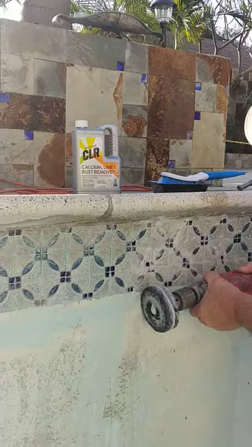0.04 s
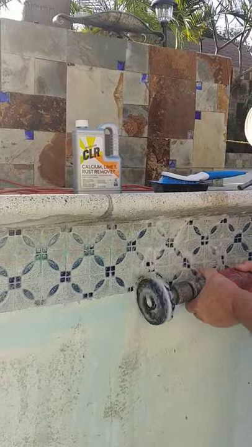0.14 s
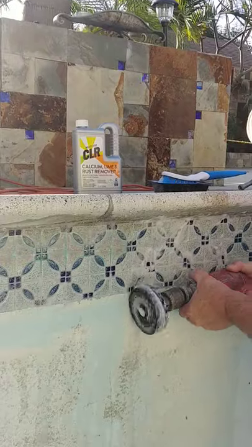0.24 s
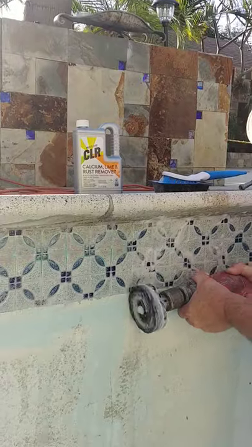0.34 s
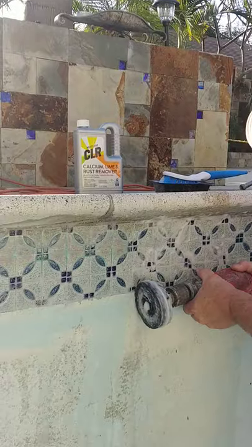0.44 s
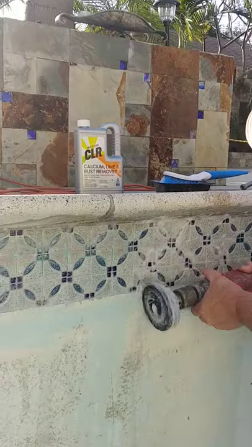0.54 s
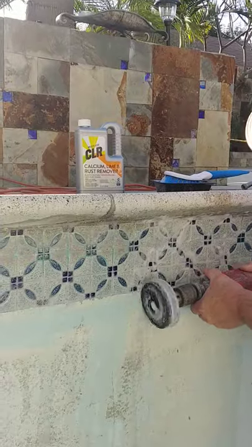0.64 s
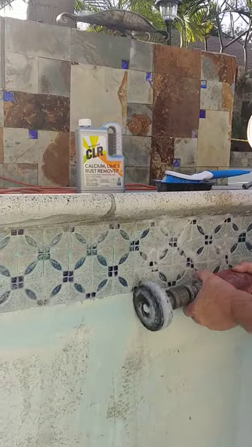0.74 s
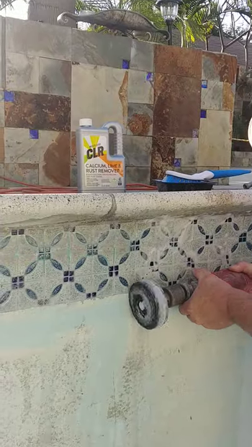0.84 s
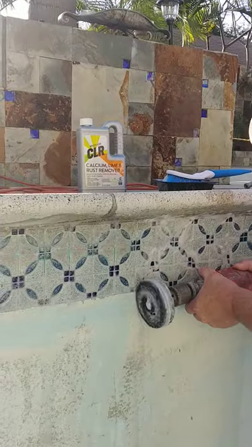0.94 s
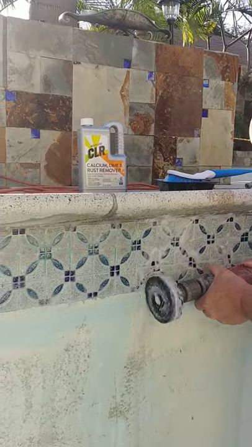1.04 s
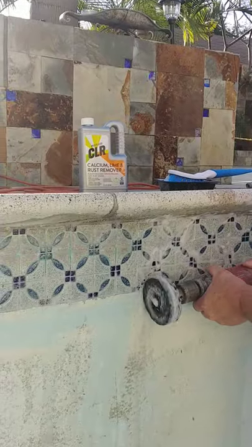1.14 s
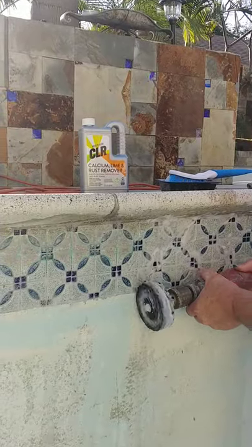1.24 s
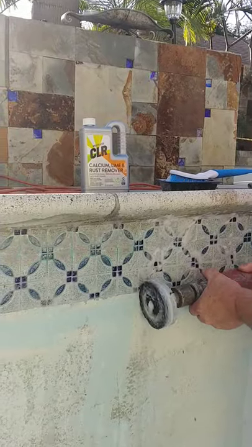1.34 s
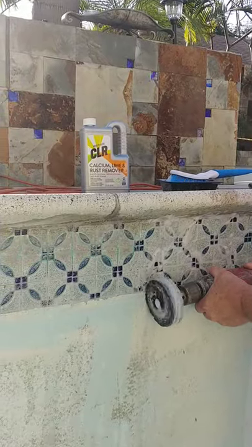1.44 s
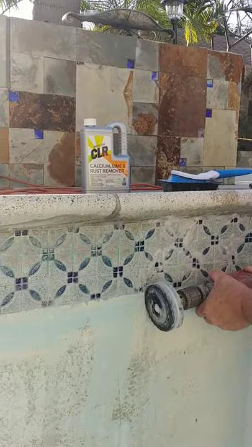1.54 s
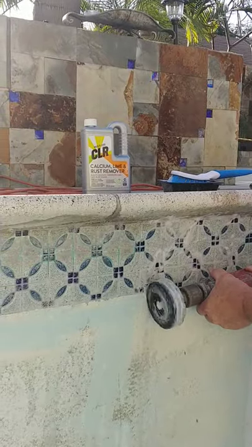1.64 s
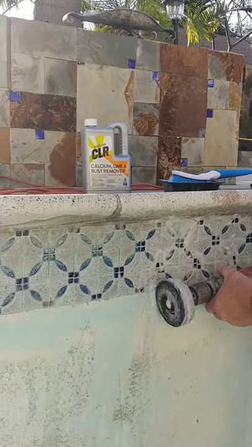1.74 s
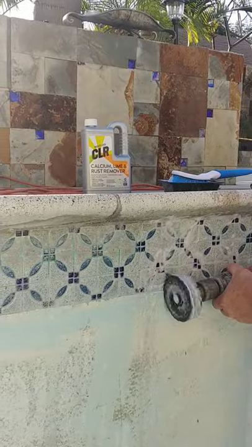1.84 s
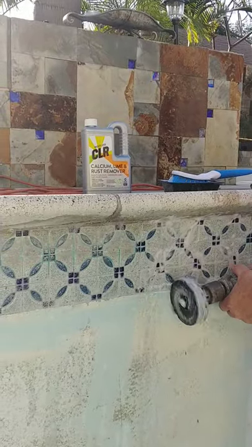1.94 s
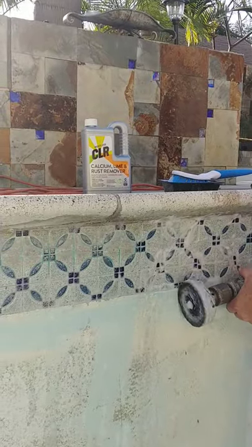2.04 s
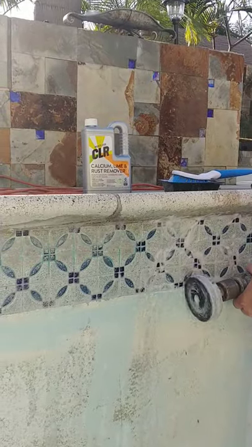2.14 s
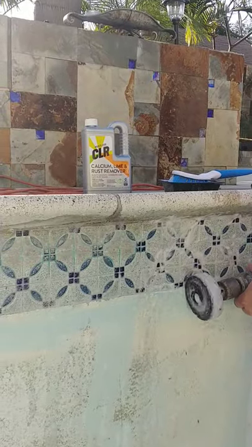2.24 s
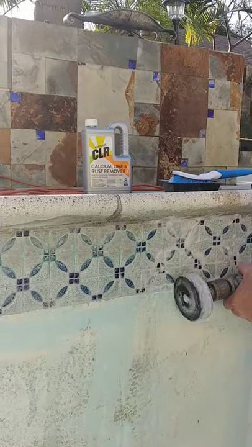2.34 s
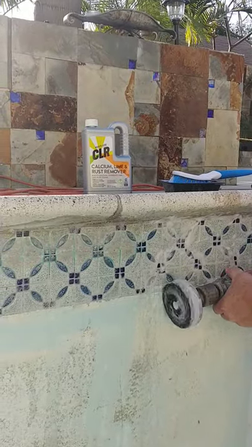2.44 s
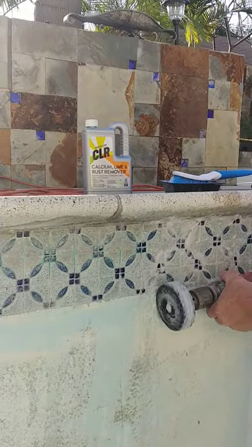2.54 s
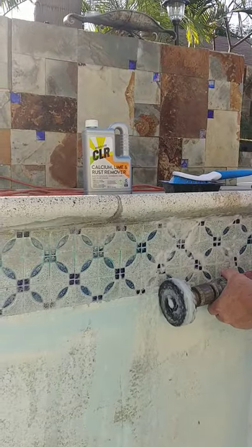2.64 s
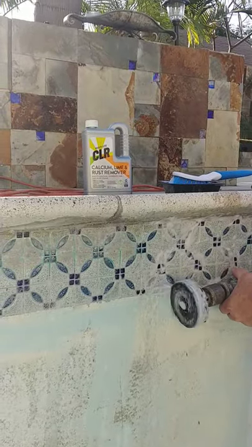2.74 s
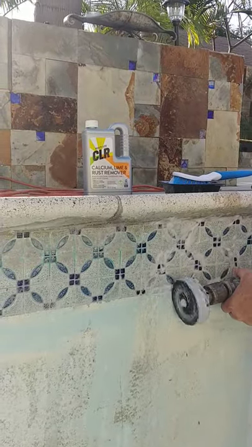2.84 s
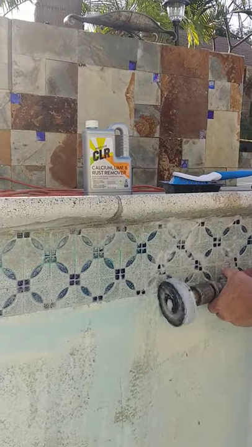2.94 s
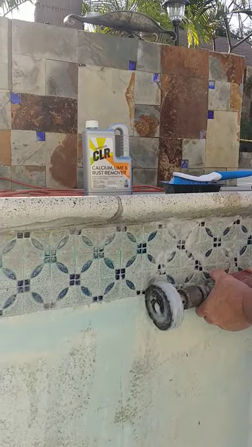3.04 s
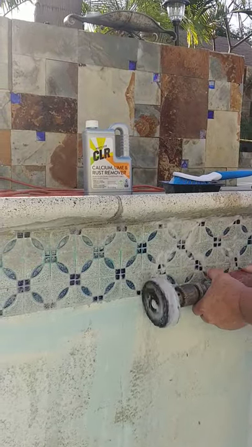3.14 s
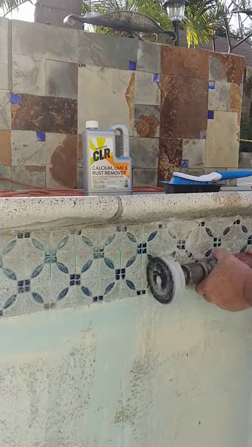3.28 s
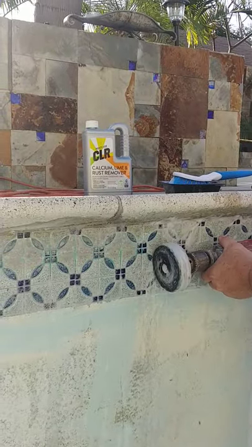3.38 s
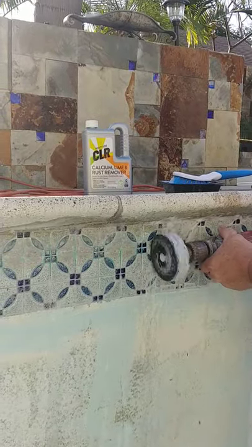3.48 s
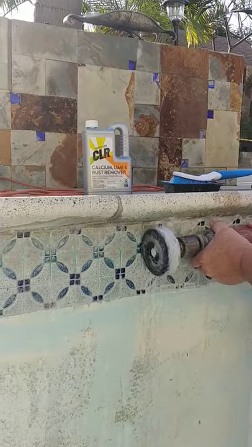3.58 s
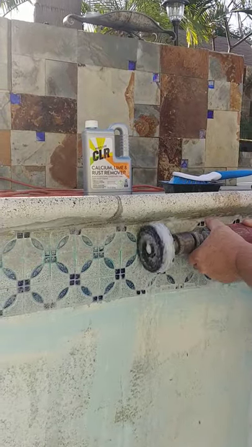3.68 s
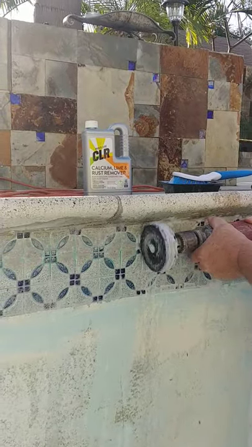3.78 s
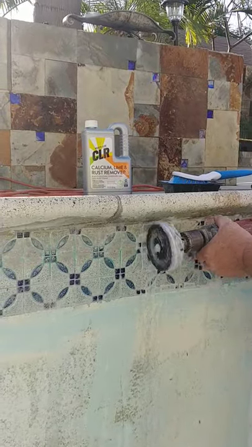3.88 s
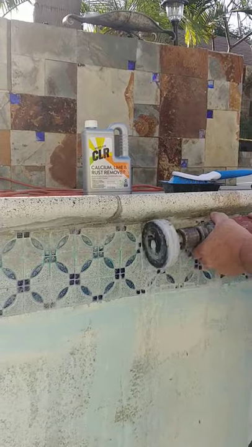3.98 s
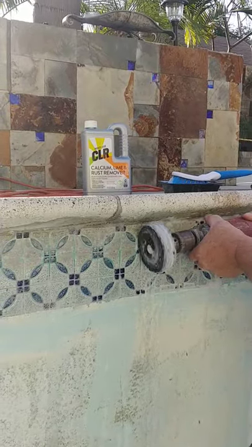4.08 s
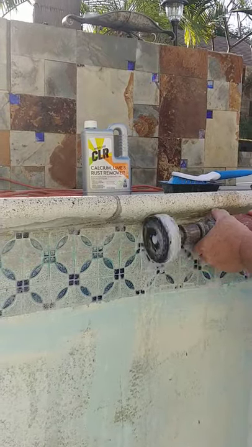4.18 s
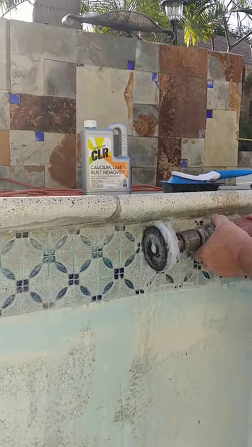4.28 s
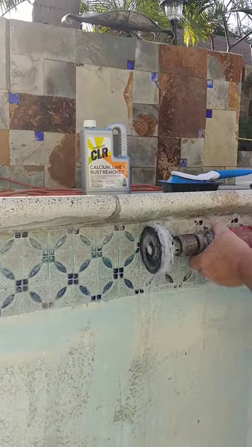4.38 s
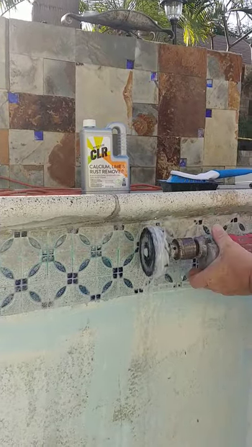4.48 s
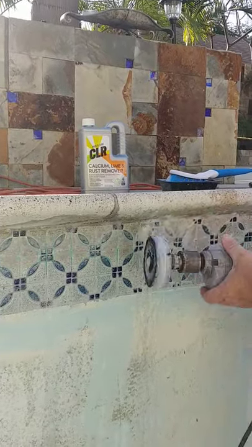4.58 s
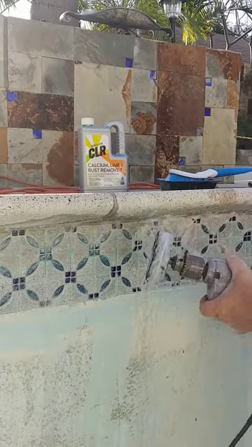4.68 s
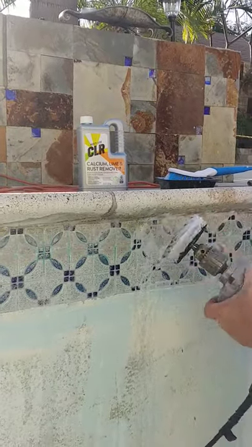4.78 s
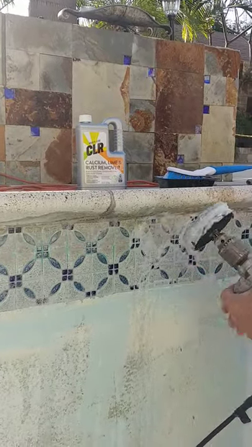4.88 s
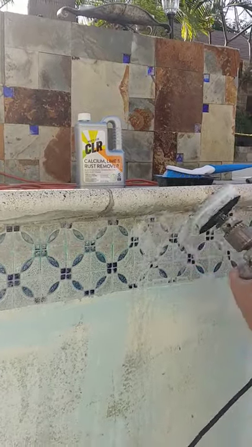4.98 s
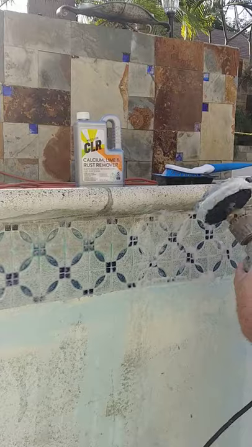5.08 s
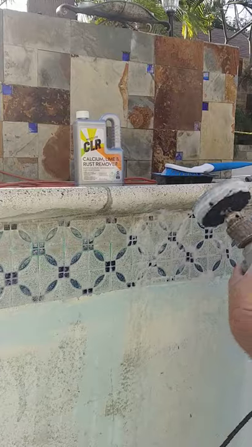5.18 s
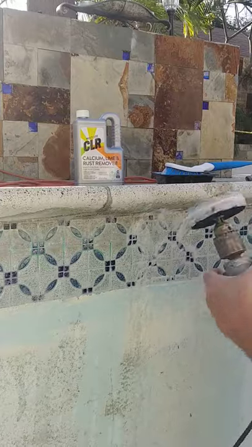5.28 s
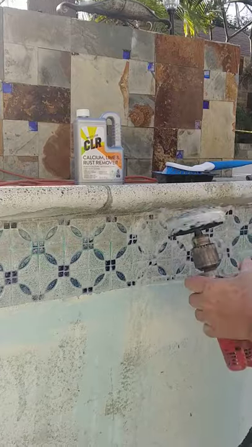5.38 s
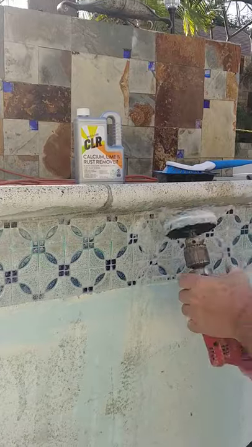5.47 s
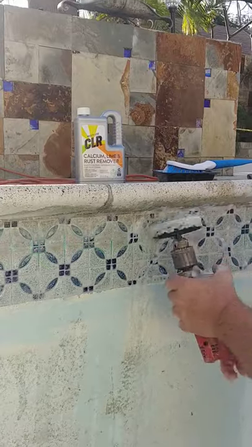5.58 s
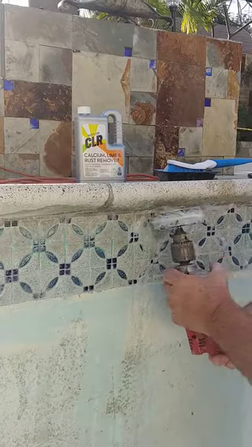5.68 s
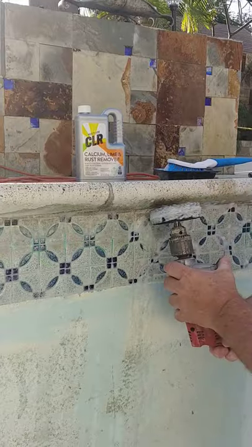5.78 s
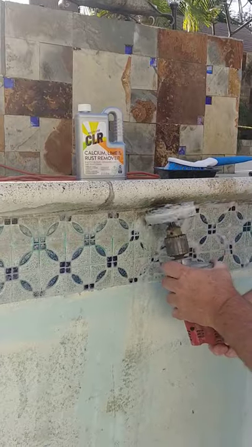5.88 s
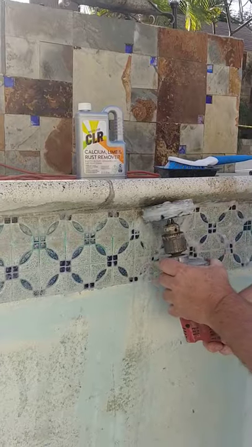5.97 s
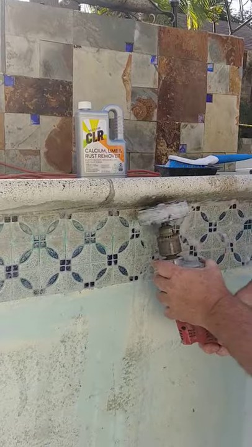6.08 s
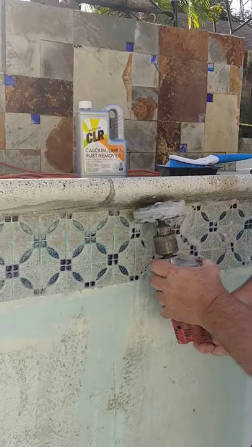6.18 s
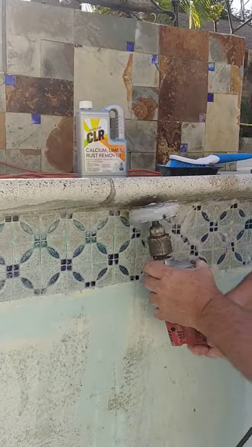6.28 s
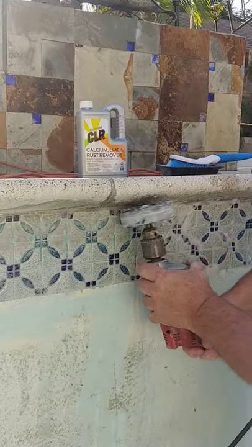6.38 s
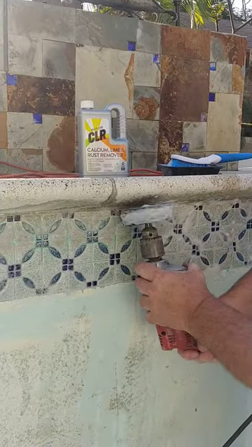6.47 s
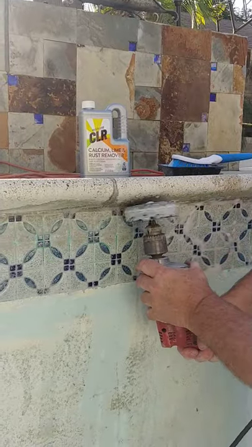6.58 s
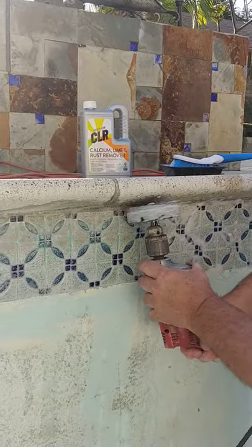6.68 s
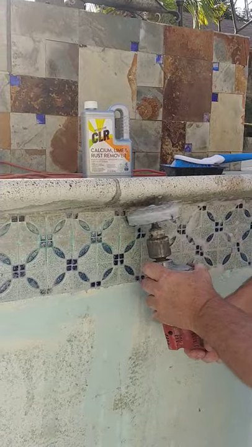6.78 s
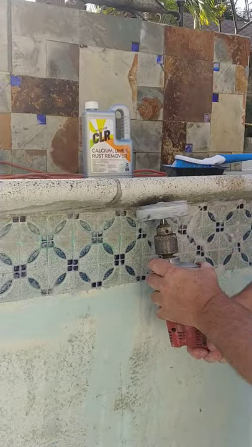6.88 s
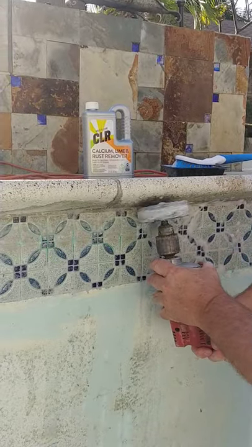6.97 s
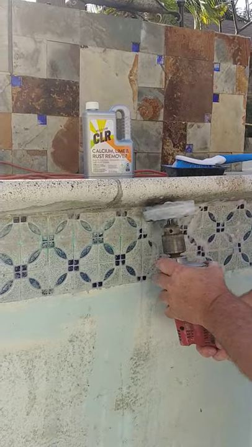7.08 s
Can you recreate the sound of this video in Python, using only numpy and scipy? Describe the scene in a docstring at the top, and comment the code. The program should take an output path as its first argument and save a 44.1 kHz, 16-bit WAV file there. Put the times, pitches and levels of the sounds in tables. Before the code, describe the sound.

A corded drill grinds an abrasive wheel on tile with a harsh gritty roar and high whine, coasts down, then revs up skipping on stone.

```python
"""A harsh grinding roar with a high whine on top: a mains drill spins an abrasive wheel on empty-pool tiles.
The roar of fan, gears and grit is shaped noise; gear teeth and rotor slots whine as sines tied to the rotor.
The wheel is lifted and the pitch sinks as the motor coasts, with knocks as the wheel is turned.
Then it runs up again with the wheel skipping on the stone rim: short bursts of noise and a rising whine.
Bands of noise swell and glide, a faint outdoor rumble lies below, and two close microphone ports hear it all."""
import sys
import numpy as np
from scipy import signal
from scipy.fft import rfft, irfft, next_fast_len
from scipy.io import wavfile

SR = 44100
rng = np.random.default_rng(int(sys.argv[2]) if len(sys.argv) > 2 else 0)


def bounce(signal):
    """Save signal as a 16-bit WAV file at the path given by the first command-line argument."""
    frames = np.transpose(np.atleast_2d(signal))
    limited = np.clip(frames, -1, 1)
    pcm = np.round(limited * 32767).astype(np.int16)
    wavfile.write(sys.argv[1], SR, pcm)


N = 313992   # length in samples

# Gear teeth and rotor slots per rotor turn; rotor turns per spindle turn; torque pulses per second
TEETH, SLOTS, GEAR_RATIO, RIPPLE_HZ = 7, 12, 5.1, 120

# Rotor speed, sagging under load, coasting and running up again: (time [s], speed [turns per s])
ROTOR_SPEED = [(0.0, 275.3), (0.3, 273.6), (1.09, 272.9), (1.45, 270), (2.1, 267.1), (2.6, 269.3),
               (2.9, 269.8), (3.15, 269.9), (3.5, 265.3), (3.86, 259.6), (4.1, 254), (4.27, 252.3),
               (4.46, 256.2), (4.6, 238), (5.0, 194.4), (5.35, 155.6), (5.6, 136.4), (5.7, 130.9),
               (5.8, 136), (5.9, 156.5), (6.03, 170.1), (6.17, 192.9), (6.21, 196.7), (6.33, 220.5),
               (6.58, 247.9), (6.83, 257), (6.92, 264.8), (7.12, 272)]

# Roar in three phases; treble and low body act only by their distance from their column's mean:
# (time [s], level [dB], treble [dB], low body [dB])
TILE_ROAR_LEVELS = [(0.0, -16.5, -14, -17.5), (1.2, -16, -14, -18), (2.3, -16.5, -15.5, -18.5),
                    (2.95, -16, -14.5, -18), (3.24, -17.5, -14.5, -16.5), (4.0, -18.5, -13.5, -17),
                    (4.3, -17.5, -14, -19.5), (4.34, -40, -11, -10)]
COASTING_ROAR_LEVELS = [(4.29, -20, -16, -14.5), (5.03, -25, -10.5, -12.5), (5.15, -26, -7.5, -14),
                        (5.2, -22.5, -12, -18), (5.33, -24.5, -13.5, -15.5), (5.47, -28, -10, -15.5),
                        (5.88, -30, -9.5, -24.5)]
RIM_ROAR_LEVELS = [(5.8, -36, -1.5, -18), (5.87, -17, -23, -22.5), (5.91, -22, -13, -18),
                   (5.96, -24, -9, -13.5), (6.03, -17, -14, -20), (6.11, -17, -13.5, -15.5),
                   (6.22, -16, -12, -16.5), (6.3, -15.5, -13, -14), (6.35, -14.5, -12, -15.5),
                   (7.12, -13.5, -11.5, -18)]
# Tone colour of the roar in each phase, before resonances: (frequency [Hz], relative level [dB per Hz])
TILE_SPECTRUM = [(150, -38.5), (260, -28), (440, -26), (540, -15.5), (900, -14), (1150, -14), (1600, -11.5),
                 (2700, -12), (4000, -16.5), (4300, -16), (5600, -14.5), (6400, -28), (7800, -23),
                 (10300, -28.5), (11600, -38), (12200, -59)]
COASTING_SPECTRUM = [(88, -51), (150, -27), (270, -25), (572, -6.5), (781, -8), (1090, -2), (1400, -2),
                     (1690, -0.5), (3150, -1.5), (5560, -2), (6320, -15.5), (7590, -12), (9990, -16),
                     (12000, -29.5), (15600, -61), (22000, -120)]
RIM_SPECTRUM = [(150, -35), (400, -25), (550, -18), (850, -16), (1400, -10.5), (2000, -8), (2600, -7),
                (4200, -6.5), (4600, -9), (5700, -7.5), (6400, -25), (7800, -18), (10300, -25.5),
                (11600, -33.5), (12200, -44)]
# Resonances of the casing on the tile, and of the rim: (centre [Hz], width [Hz], boost [dB])
CASING_RESONANCES = [(1085, 170, 6), (1950, 294, 8.5), (3230, 250, 3.5), (3880, 79, 7), (8200, 150, 5.5)]
RIM_RESONANCES = [(2422, 98, 2.5), (3220, 590, 2)]
# The roar is built from neighbouring bands between these edges
BAND_EDGES_HZ = 100 * 2 ** np.arange(0, 7.6, .75)

# Stages of the work: flat on the tile, leaning in, coasting, at its slowest, skipping on the rim,
# grinding the rim: (start [s], end [s])
WORK_STAGES = [(0.0, 3.3), (3.8, 4.27), (4.33, 5.36), (5.44, 5.97), (6.02, 6.5), (6.57, 7.12)]
# Main tones before resonances, dips and bites: multiple of a turn -> (level in each of the six stages [dB])
TONE_LEVELS = {1: (-53.5, -52.5, -58.5, -65, -64, -57.5), 2: (-55, -58, -59.5, -69, -76, -64.5),
               7: (-38.5, -40, -59, -59.5, -49.5, -41), 12: (-46, -45, -57, -59, -42.5, -47),
               14: (-45, -40.5, -57, -60, -44.5, -39), 15: (-58, -76, -94, -64, -83, -59),
               21: (-38.5, -36.5, -49, -53.5, -39.5, -32.5), 28: (-47.5, -63, -64, -57, -43.5, -60),
               35: (-39.5, -59, -42, -57, -42, -36.5)}
# Faint rotor tones beside the tooth tones: (multiple of a turn, level against the nearest tooth tone [dB])
FAINT_ROTOR_TONES = [(3, -32.5), (29, -4), (30, -18), (31, -5), (36, -9.5)]
# Slot tone split by the torque pulses: (shift [pulse rates], level against the slot tone [dB])
SLOT_SIDE_TONES = [(-1, -24), (-1, -2.5), (1, -10.5)]
# Gearbox resonances, and dips such as the microphone's near 6300 Hz, that a tone passes through:
# (centre [Hz], width [Hz], change [dB])
TONE_RESONANCES_AND_DIPS = [(519.6, 68, 15), (1005, 73, 11), (1214, 96, 17.5), (1374, 120, 11.5),
                            (1688, 70, 3), (1859, 264, 13.5), (2390, 170, 10.5), (2660, 250, 10.5),
                            (2954, 105, 13), (3300, 300, 14), (3589, 67, 10), (4023, 69, 18.5),
                            (4900, 740, -6.5), (5414, 990, 9), (6290, 450, -17), (6700, 310, 0.5),
                            (7430, 200, 7.5), (8350, 155.3, 4.5)]
# The wheel bites and loads the gears, or lets go: (time [s], half length [s], change in the tones [dB])
WHEEL_BITES = [(3.685, .1, -2), (5.891, 0.051, 12), (6.045, 0.028, 2), (6.123, 0.033, -2),
               (6.23, 0.047, 4.5), (6.373, 0.049, 7), (6.48, .03, -1.5)]
TONE_WANDER_DB = 1.2   # slow chance change of each main tone

# Bands of roar that swell as the drill turns against the wall:
# (start [s], end [s], start [Hz], end [Hz], nominal width [Hz], full level [dB], pulsing [0-1])
SWELLING_BANDS = [(1.35, 2.05, 4050, 4020, 38, -32.5, 0.6), (5.38, 5.75, 1130, 1050, 77, -41, 0.2),
                  (5.4, 5.7, 1720, 1900, 50, -40, 0.4), (3.6, 4.33, 2250, 2258, 109, -27.5, 0.4),
                  (3.7, 4.9, 3330, 3290, 140, -31, .1), (4.7, 4.72, 6700, 1900, 164, -49, 0),
                  (4.5, 5.0, 1400, 1070, 91, -30.5, .02), (5.0, 5.45, 1120, 1490, 126, -34, .02),
                  (4.75, 5.12, 3000, 3200, 510, -27.5, 0.2), (4.7, 5.3, 4700, 4400, 550, -30.5, 0.26),
                  (6.4, 9.5, 4020, 2300, 127, -33, 0.93)]
SWELL_RISE_S, SWELL_FALL_S = 0.09, .06

# Knocks as the wheel is turned and skips on the rim: (time [s], nominal peak [dB])
WHEEL_SKIPS = [(4.4965, -17), (4.775, -9), (4.797, -9), (4.938, -11), (4.968, -7), (5.003, -8),
               (5.0593, -5.5), (5.1881, -6), (5.7477, -11), (5.8105, -8), (5.861, -6), (5.977, -6),
               (6.0014, -9), (6.0223, -4.5), (6.116, -7.5), (6.1684, -6), (6.3264, -3), (6.418, -2)]
GRIT_CREST_DB = 7.5   # peak of a burst over its average strength (rms)
SKIP_T60_S = 0.031   # time for a burst to fall by 60 dB

# Distant outdoor rumble: (time [s], level [dB])
RUMBLE_LEVELS = [(0.0, -51.5), (3.0, -51), (5.8, -48), (6.2, -46), (6.5, -48), (7.12, -52)]
# Its tone colour: (frequency [Hz], relative level [dB per Hz])
RUMBLE_SPECTRUM = [(13, -40), (22, -14), (59, 2), (161, -9.5), (226, -14), (263, -14.5), (300, -7.5),
                   (390, -23), (660, -120)]
RUMBLE_WAVER_DB = -1.5   # spread of its chance wavering; the sign does not matter

# How alike the noise is at the two ports: (frequency [Hz], likeness [0-1])
PORT_LIKENESS = [(60, 0.37), (130, 0.69), (270, 0.89), (570, 0.95), (1220, 0.9), (2580, 0.6), (5480, 0.27),
                 (11600, 0.2)]
# Balance of the ports: (frequency [Hz], left minus right [dB])
PORT_BALANCE = [(60, -4.5), (130, 0.5), (270, 0.0), (570, -1.0), (1220, -2), (2580, -5), (5480, -3.5),
                (11600, -10)]
# Phase by which the left port leads: (frequency [Hz], lead [radians])
LEFT_LEAD = [(200, .1), (600, 0), (1900, -.7), (3200, .5), (4500, .9), (5600, .3), (8000, .8), (9400, .6),
             (11000, 2.3)]
CUTOFF_HZ = 12050   # the steep top filter cuts above this


def from_db(db):
    """Turn decibels into a gain."""
    return 10 ** (np.asarray(db) / 20)


def rms_one(x):
    """Scale a signal to an average strength (rms) of 1."""
    return x / np.sqrt(np.mean(x ** 2) + 1e-20)


def in_time(rows):
    """Join a table's points with straight lines, giving each column one value per sample."""
    times, *columns = np.transpose(rows)
    return [np.interp(np.arange(N) / SR, times, column) for column in columns]


def at_hz(points, hz):
    """Read a table between its points, spacing frequencies by pitch."""
    p = np.array(points, float)
    return np.interp(np.log(np.maximum(hz, 1)), np.log(np.maximum(p[:, 0], 1)), p[:, 1])


def resonance_db(hz, peaks):
    """Resonances and dips change the level most at their centre and less and less to either side."""
    return sum(top / (1 + (2 * (hz - mid) / width) ** 2) for mid, width, top in peaks)


def drift(rate):
    """Chance wandering with spread 1; a higher rate [Hz] wanders faster."""
    pole = np.exp(-80 * np.pi * rate / SR)   # worked out at every 40th sample
    white = rng.standard_normal(N // 40 + 2002)
    slow = signal.lfilter([1], [1, -2 * pole, pole * pole], white)[2000:]   # skip the filter's start
    return np.interp(np.arange(N) / 40, np.arange(len(slow)), rms_one(slow))


def colour(x, spectrum, peaks=()):
    """Filter noise to a spectrum with resonant humps, then scale it to rms 1."""
    size = next_fast_len(N)
    hz = np.arange(size // 2 + 1) * SR / size
    db = at_hz(spectrum, hz) + resonance_db(hz, peaks)
    return rms_one(irfft(rfft(x, size) * from_db(db), size)[..., :N])


def noise_bands():
    """Split two draws of white noise into bands, taken in turn so that neighbours are unrelated."""
    white = rng.standard_normal((2, 2, N))
    bands = []
    for k, edges in enumerate(zip(BAND_EDGES_HZ, BAND_EDGES_HZ[1:])):
        band_filter = signal.butter(2, edges, "band", fs=SR, output="sos")
        bands.append(signal.sosfilt(band_filter, white[k % 2]))
    return bands


def roar(bands, curve, spectrum, peaks, throb, patchy_db, fade_s):
    """Fan, gears and grit make patchy noise that throbs, mostly below the airy top."""
    level_db, treble_db, body_db = in_time(curve)
    _, _, mean_treble, mean_body = np.mean(curve, axis=0)
    treble_db, body_db = treble_db - mean_treble, body_db - mean_body
    out, together = 0, drift(33)
    for band, low, high in zip(bands, BAND_EDGES_HZ, BAND_EDGES_HZ[1:]):
        octave = np.log2(np.sqrt(low * high) / 2500)   # distance from 2500 Hz
        lift_db = treble_db * np.clip(octave - .5, 0, 1) + body_db * np.clip(-octave - .5, 0, 1)
        fan = octave > 1   # the top is air from the fan: steadier
        patches = from_db(lift_db + patchy_db * (0.65 * together * (1 - fan) + drift(10.0)))
        out = out + band * (patches * (1 + throb * (.3 if fan else 1)))
    t = np.arange(N) / SR
    start, end = curve[0][0], curve[-1][0]
    # No fade where the phase touches the start or end of the sound
    rise = np.clip((t - start) / fade_s + (start == 0), 0, 1)
    fall = np.clip((end - t) / fade_s + (end > 7), 0, 1)
    return colour(out, spectrum, peaks) * from_db(level_db) * rise * fall


def tone_levels(speed):
    """Each tone follows the stage of work, resonances and dips, the wheel's bites and slow chance."""
    t = np.arange(N) / SR
    bite_db = sum(db * np.exp(-((t - s) / half) ** 2) for s, half, db in WHEEL_BITES)
    levels = {}
    for k, stage_db in TONE_LEVELS.items():
        work_db = np.interp(t, np.ravel(WORK_STAGES), np.repeat(stage_db, 2))
        wander_db = TONE_WANDER_DB * drift(1.2)
        levels[k] = work_db + bite_db + wander_db + resonance_db(k * speed, TONE_RESONANCES_AND_DIPS)
    return levels


def whine(turns, tone, wobble_db, spindle_depth, jitter):
    """Teeth and slots pass at multiples of the rotor's turns; tooth tones also beat with the spindle."""
    # Gear play: the angle wanders, most when slow
    speed = np.gradient(turns * SR)
    turns = turns + jitter * drift(27) * (270 / speed) ** 1.9
    lines = [(k, 0, db) for k, db in tone.items()]
    for k, db in FAINT_ROTOR_TONES:
        nearest = TEETH * max(round(k / TEETH), 1)
        lines.append((k, 0, tone[nearest] + db))
    lines += [(SLOTS, step, tone[SLOTS] + db) for step, db in SLOT_SIDE_TONES]
    spindle = np.cos(2 * np.pi * turns / GEAR_RATIO) + np.cos(np.pi * turns / GEAR_RATIO)
    beat = 1 + spindle_depth * spindle
    out, ripple = 0, RIPPLE_HZ * np.arange(N) / SR
    for k, step, db in lines:
        angle = 2 * np.pi * (k * turns + step * ripple + rng.random())
        waver_db = wobble_db * (0.37 * drift(9.8) + 0.63 * drift(59))
        sine = np.sqrt(2) * from_db(db + waver_db) * np.cos(angle)   # root 2 turns rms into peak
        out = out + sine * (beat if k % TEETH == 0 else 1)
    return out


def swells(wobble):
    """Slow noise on a gliding carrier makes a moving band; the wheel's wobble pulses it."""
    out, t = np.zeros((2, N)), np.arange(N) / SR
    for start, end, start_hz, end_hz, width, db, pulsing in SWELLING_BANDS:
        carrier_hz = np.interp(t, [start, end], [start_hz, end_hz])
        angle = 2 * np.pi * np.cumsum(carrier_hz) / SR
        shape = np.clip(np.minimum((t - start) / SWELL_RISE_S, (end - t) / SWELL_FALL_S), 0, 1)
        gain = from_db(db) * (1 + np.clip(pulsing, 0, 1) * wobble) * shape
        rate = width * .79   # wider bands need faster noise
        for side in out:
            side += gain * (drift(rate) * np.cos(angle) + drift(rate) * np.sin(angle))
    return out


def skips():
    """Each knock or skip is a short burst of grit noise: a quick rise, then decay."""
    envelope, t = np.zeros(N), np.arange(N) / SR
    for s, db in WHEEL_SKIPS:
        after = np.maximum(t - s, 0)
        decay = from_db(db - GRIT_CREST_DB - 60 * after / SKIP_T60_S)
        envelope += decay * np.minimum(after / 0.0019, 1)   # rise takes 1.9 ms
    return colour(rng.standard_normal((2, N)), RIM_SPECTRUM) * envelope


def rumble():
    """Distant outdoor rumble is low noise that wavers by chance."""
    level_db = in_time(RUMBLE_LEVELS)[0] + RUMBLE_WAVER_DB * drift(10)
    return from_db(level_db) * colour(rng.standard_normal((2, N)), RUMBLE_SPECTRUM)


def ports(shared, own, tones):
    """The right port hears the shared sound shifted in phase plus its own noise; port levels differ."""
    size = next_fast_len(N)
    hz = np.arange(size // 2 + 1) * SR / size
    shared, own, tones = rfft(shared, size), rfft(own, size), rfft(tones, size)
    alike = np.clip(at_hz(PORT_LIKENESS, hz), 0, 1)
    tilt = from_db(at_hz(PORT_BALANCE, hz) / 2)   # half to each side
    shift = np.exp(-1j * at_hz(LEFT_LEAD, hz))
    left = (shared + tones) * tilt
    right = (shift * (alike * shared + tones) + np.sqrt(1 - alike ** 2) * own) / tilt
    return irfft(np.array([left, right]), size)[:, :N]


def scene():
    """One rotor speed drives the whine and throbs; roar, swells, skips and rumble join at the ports."""
    speed, = in_time(ROTOR_SPEED)
    turns, t = np.cumsum(speed) / SR, np.arange(N) / SR
    wobble = np.cos(np.pi * turns / GEAR_RATIO)   # wheel runs out of true, at half the spindle's rate
    spindle = 0.66 * np.cos(2 * np.pi * turns / GEAR_RATIO) + wobble
    mains = np.cos(2 * np.pi * RIPPLE_HZ * t)   # torque pulses twice a mains cycle
    # The torque pulses throb only in the two powered phases of the roar
    tile_throb = 0.11 * mains + .07 * spindle
    rim_throb = 0.097 * mains + .1 * spindle
    bands = noise_bands()
    noise = roar(bands, TILE_ROAR_LEVELS, TILE_SPECTRUM, CASING_RESONANCES, tile_throb,
                 patchy_db=0.72, fade_s=0.018)
    noise += roar(bands, COASTING_ROAR_LEVELS, COASTING_SPECTRUM, (), .12 * spindle,
                  patchy_db=0.47, fade_s=0.036)
    noise += roar(bands, RIM_ROAR_LEVELS, RIM_SPECTRUM, RIM_RESONANCES, rim_throb,
                  patchy_db=1.0, fade_s=0.076)
    noise += swells(wobble) + skips() + rumble()
    tones = whine(turns, tone_levels(speed), wobble_db=4.0, spindle_depth=0.028, jitter=0.003)
    return ports(noise[0], noise[1], tones)


def record(dry):
    """Loud peaks are gently rounded, then a steep filter cuts the top."""
    rounded = 1.52 * np.tanh(dry / 1.465)
    top_cut = signal.ellip(10, .5, 70, CUTOFF_HZ, fs=SR, output="sos")
    return signal.sosfilt(top_cut, rounded)


dry = scene()
out = record(dry)
bounce(out)
```